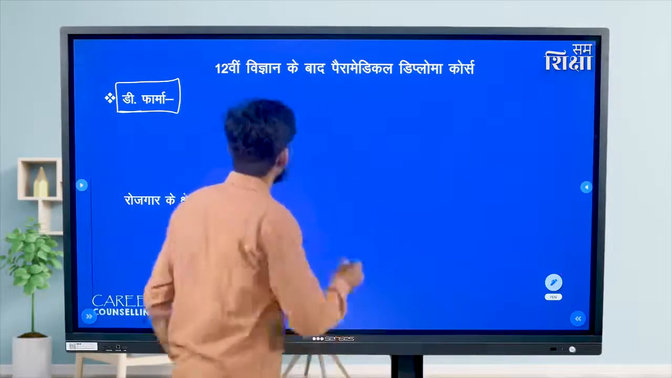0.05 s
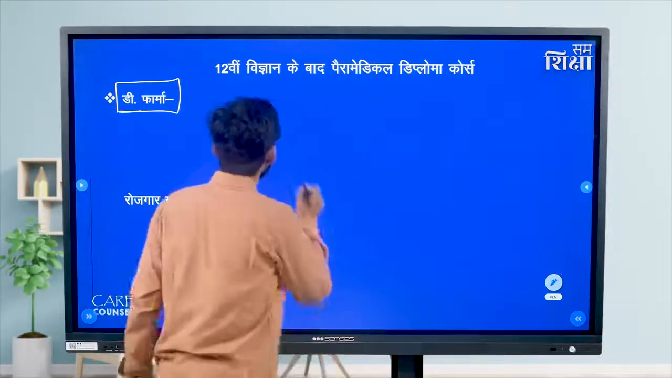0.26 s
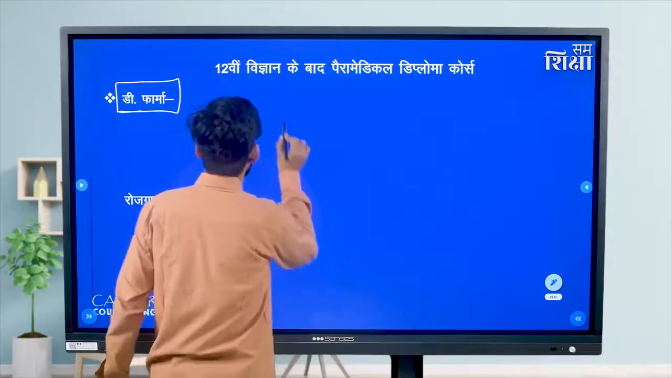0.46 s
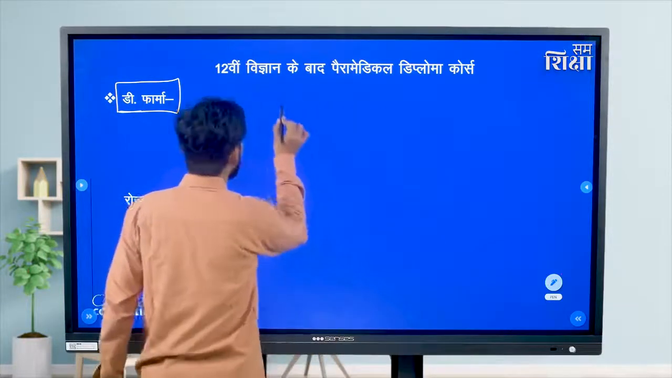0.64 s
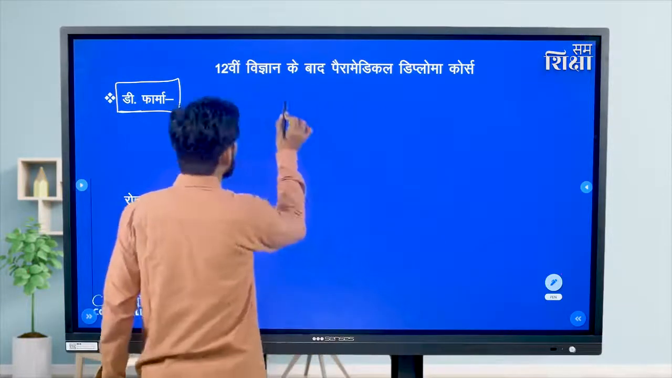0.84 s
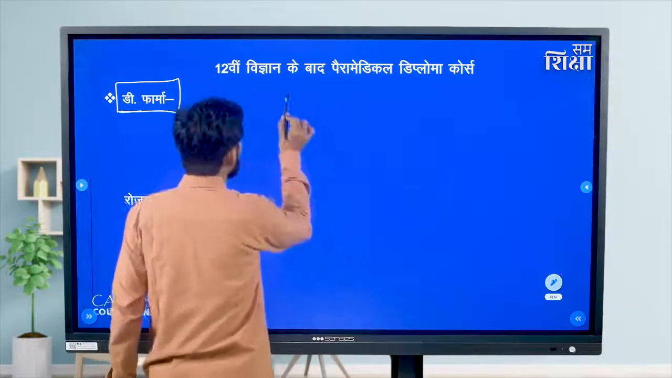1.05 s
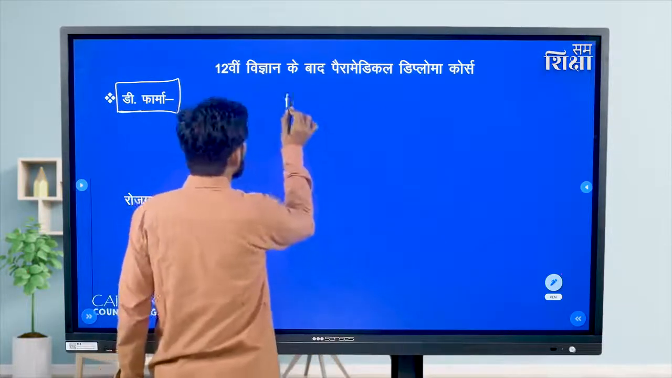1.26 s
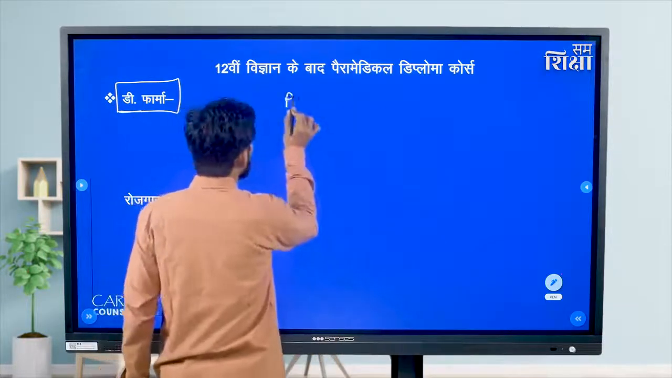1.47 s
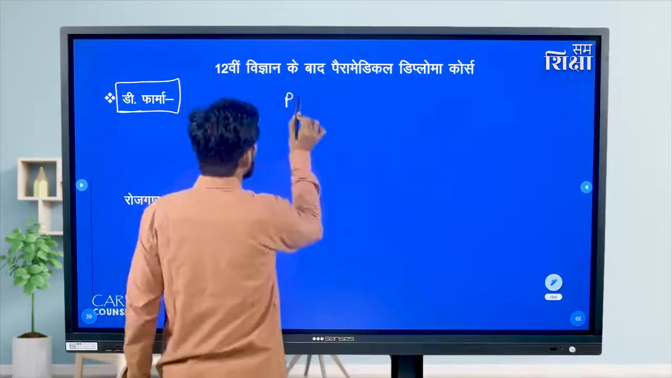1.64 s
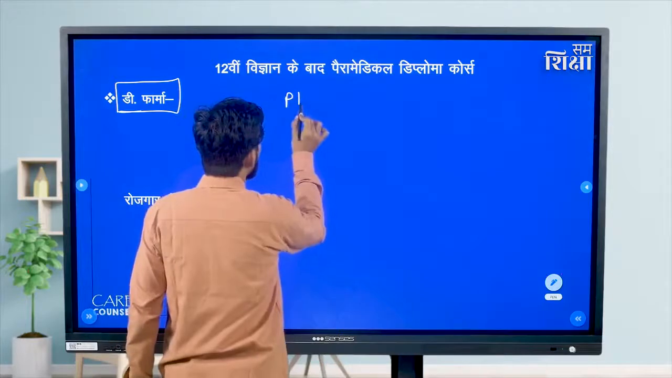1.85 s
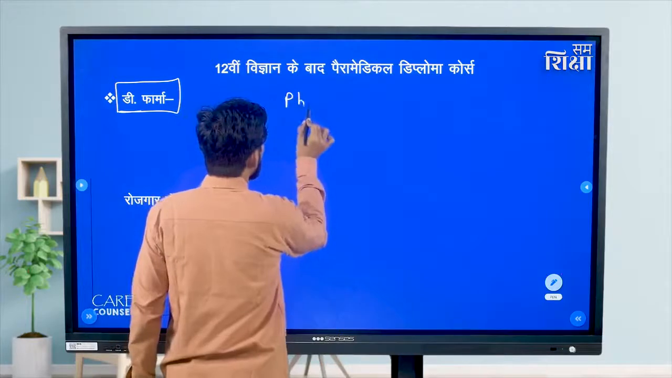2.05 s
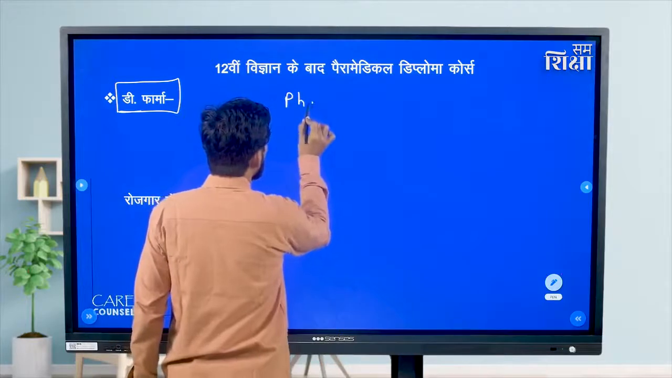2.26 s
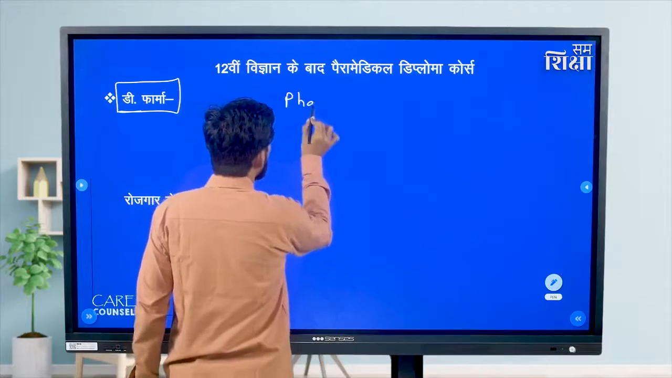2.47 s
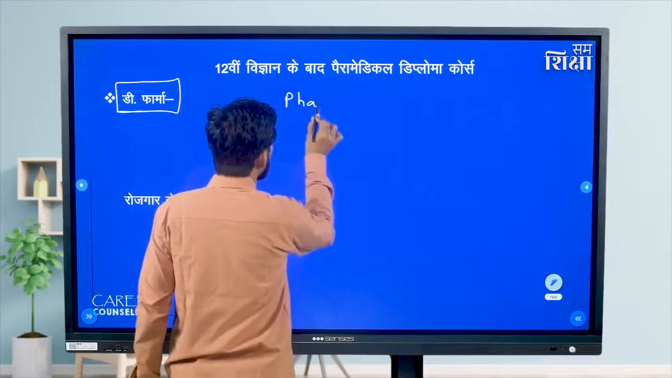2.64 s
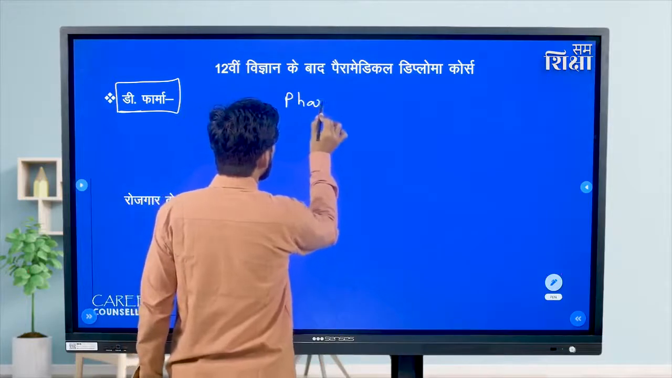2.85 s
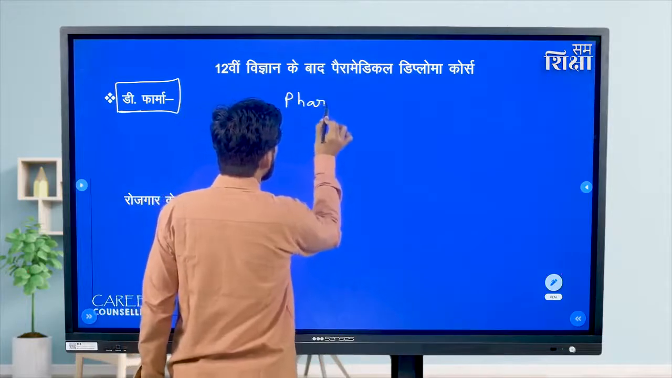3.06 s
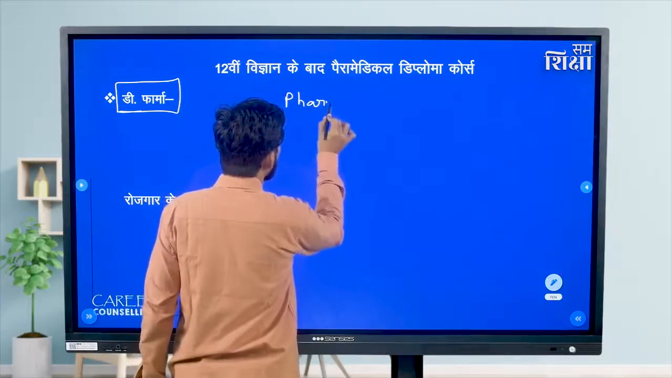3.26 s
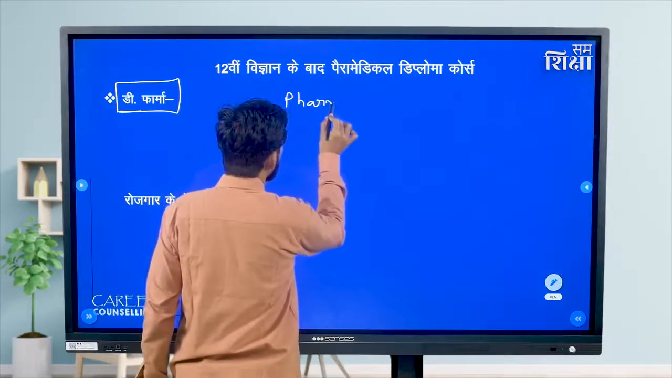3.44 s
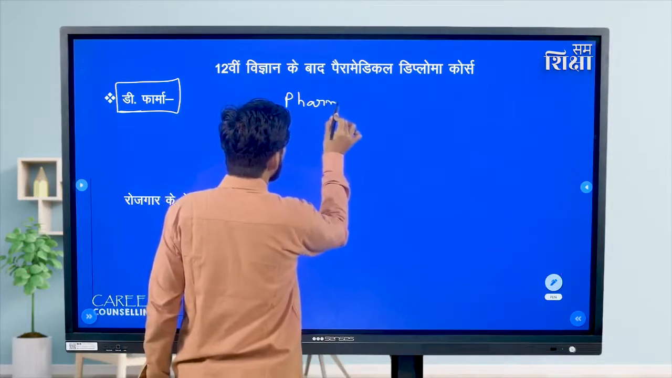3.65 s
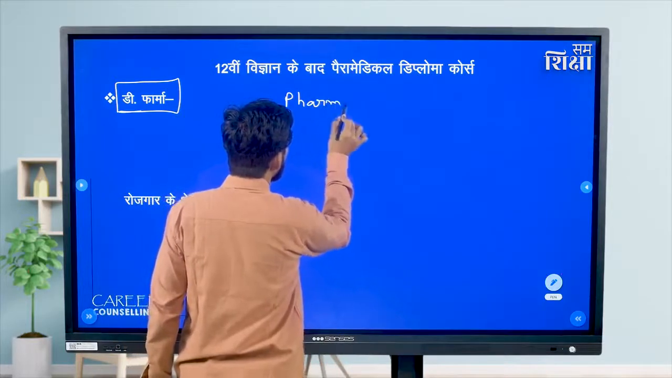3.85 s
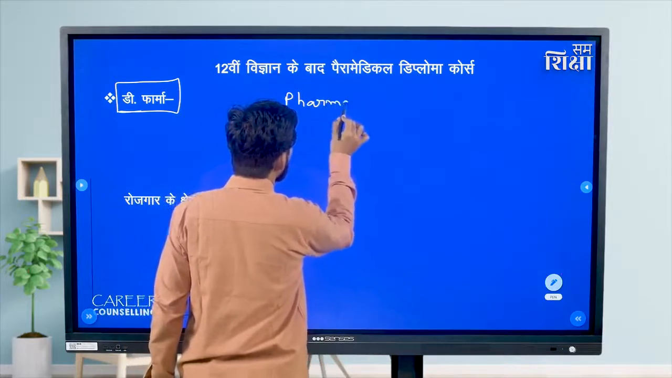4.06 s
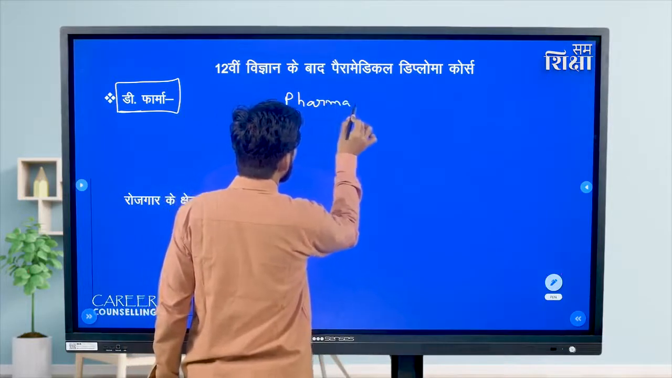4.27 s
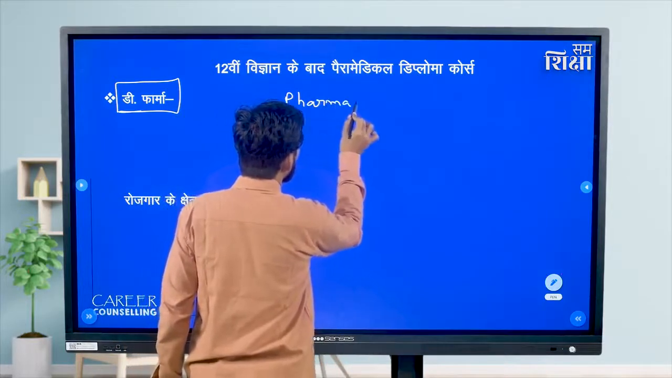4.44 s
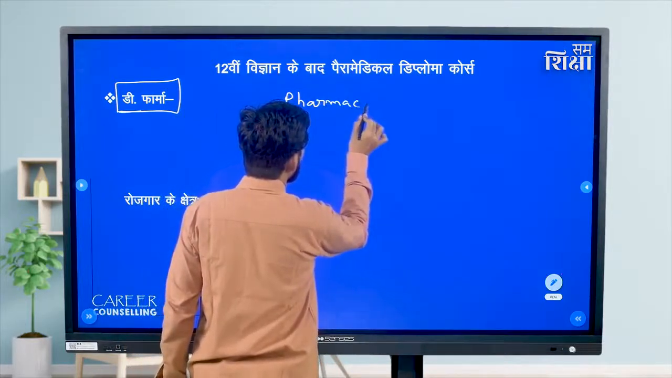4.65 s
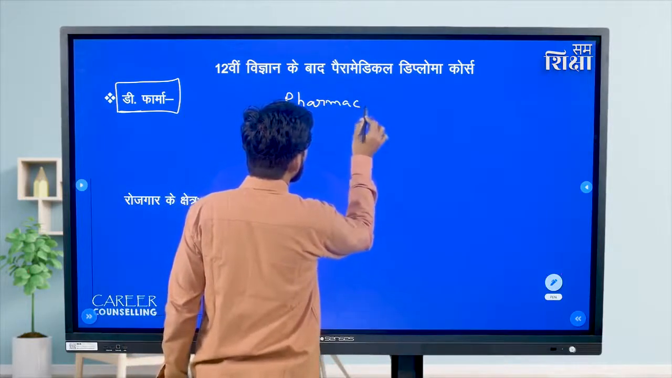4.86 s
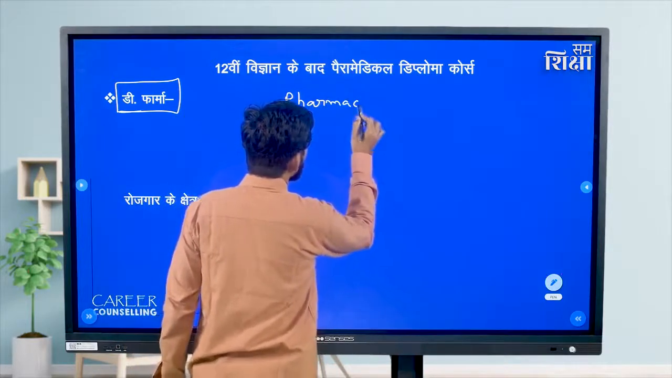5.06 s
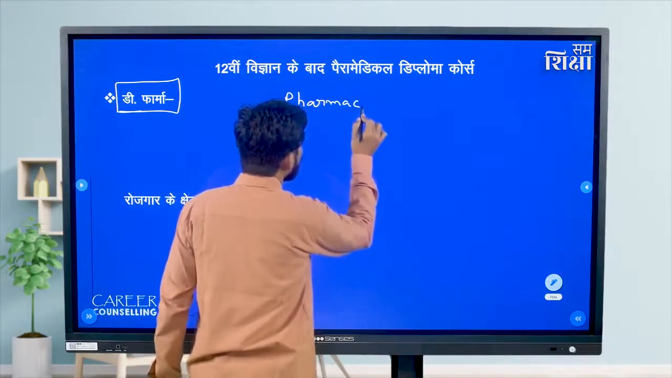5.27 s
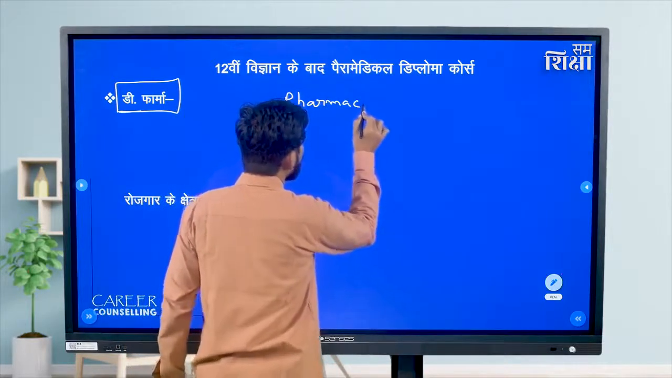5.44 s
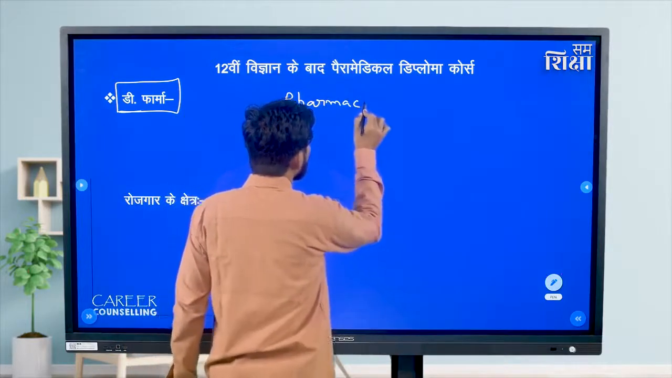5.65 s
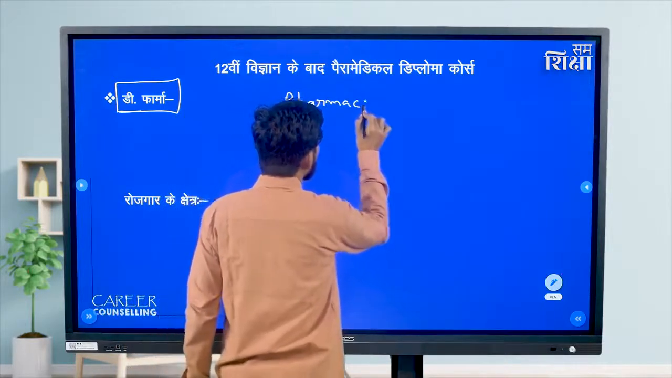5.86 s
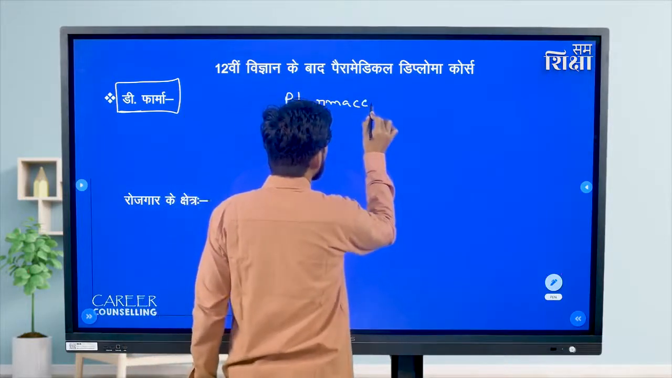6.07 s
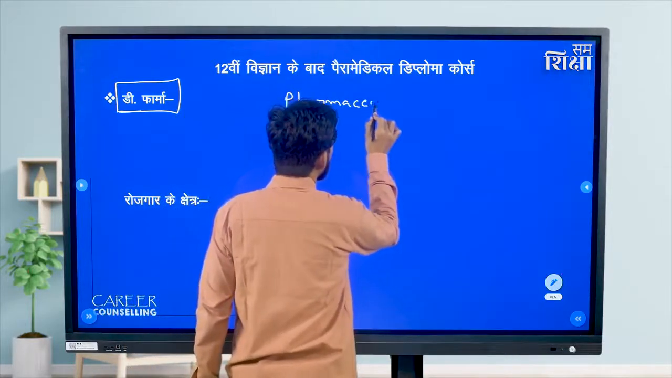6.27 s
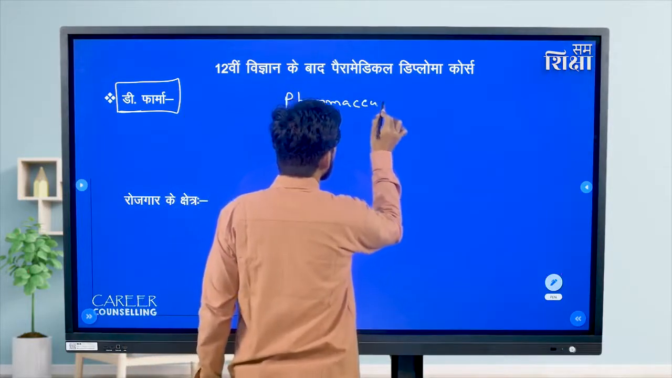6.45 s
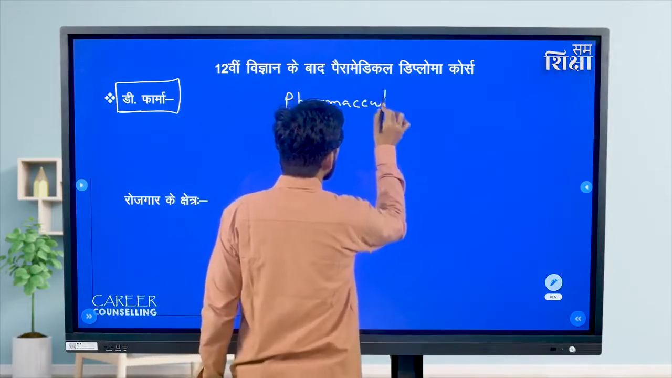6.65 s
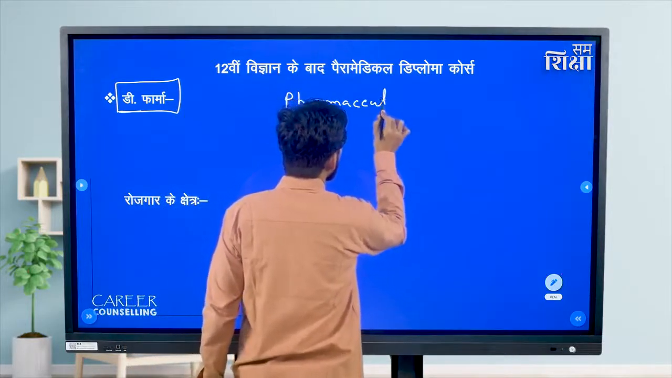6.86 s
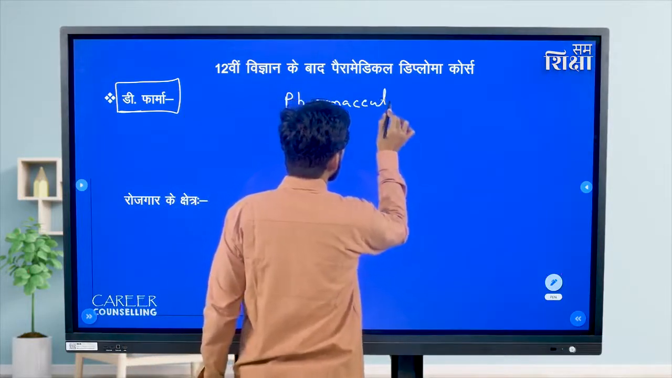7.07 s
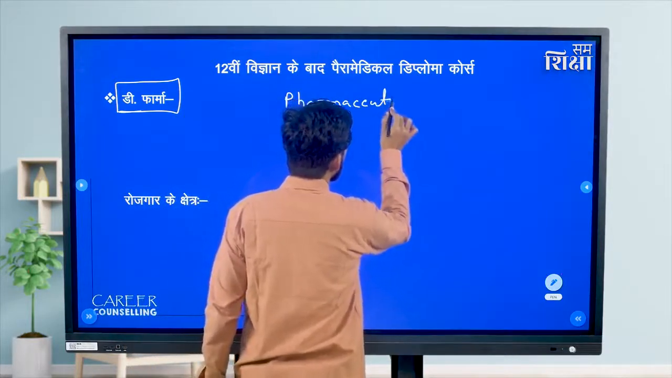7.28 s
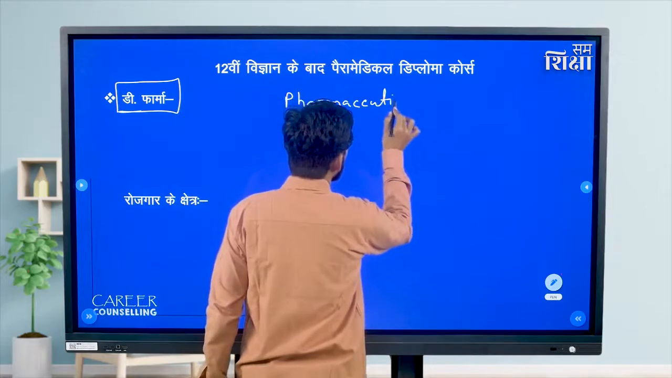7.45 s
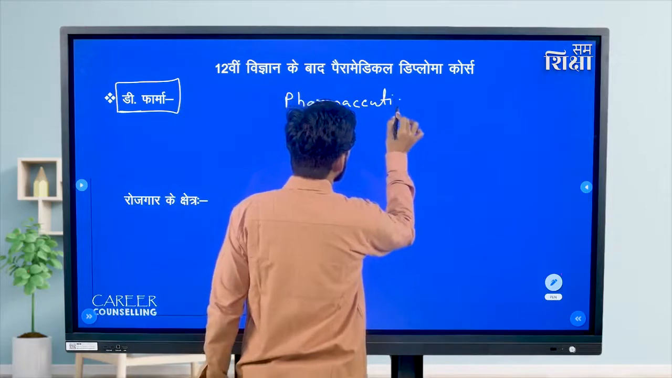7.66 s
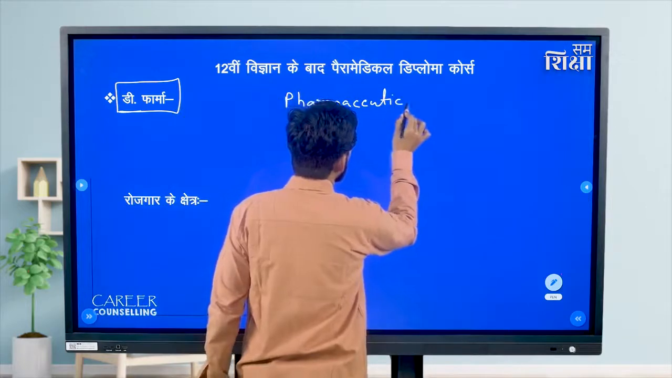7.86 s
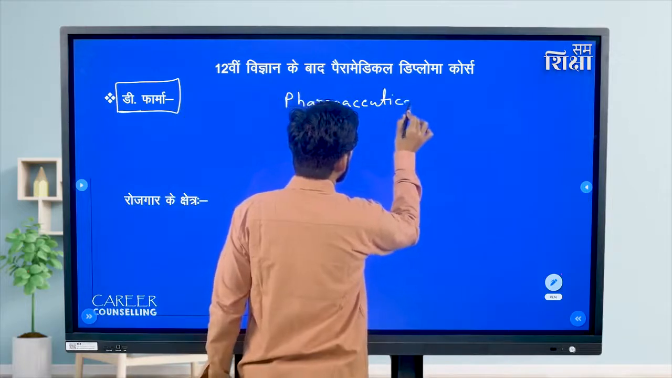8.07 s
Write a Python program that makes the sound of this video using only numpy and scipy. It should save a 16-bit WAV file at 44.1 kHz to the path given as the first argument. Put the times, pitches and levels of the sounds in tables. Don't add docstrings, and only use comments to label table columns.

```python
import sys
import numpy as np
from scipy import signal
from scipy.io import wavfile
from scipy.ndimage import uniform_filter1d

SR = 44100
rng = np.random.default_rng(int(sys.argv[2]) if len(sys.argv) > 2 else 0)


def store_wav(level_fs):
    pcm = np.round(np.clip(np.atleast_2d(level_fs), -1, 1) * 32767)
    wavfile.write(sys.argv[1], SR, pcm.T.astype(np.int16))


def volts_from_decibels(level):
    exponent = np.asarray(level, float) / 20
    return 10 ** exponent


N = 357651


def evened(x):
    return x / np.sqrt(np.mean(x ** 2) + 1e-20)


def read(f, value, hz):
    return np.interp(np.log(hz + 1), np.log(np.add(f, 1)), value)


def add(mix, s, sound):
    part = mix[max(round(s * SR), 0):][:len(sound)]
    part += sound[:len(part)]


def highpass(x, edge_hz):
    return signal.lfilter(*signal.butter(N=1, Wn=edge_hz, btype="high", fs=SR), x)


def ring(modes, rise_s):
    t = np.arange(24000) / SR
    sines = sum(volts_from_decibels(db - 60 * t / t60) * np.sin(2 * np.pi * hz * t) for hz, db, t60 in modes)
    return (1 - np.exp(-t / rise_s)) * sines


def noise(colour, patchy_db):
    real, imag, patches = rng.standard_normal((N // 256 + 5, 513, 3)).T
    patches = evened(uniform_filter1d(uniform_filter1d(patches, 12, 0), 10, 1))
    colour_db = read(*np.transpose(colour), np.fft.rfftfreq(1024, 1 / SR))[:, None]
    z = (real + 1j * imag) * volts_from_decibels(colour_db + patchy_db * patches)
    return evened(signal.istft(z, nperseg=1024, noverlap=768)[1][:N])


def level(rows, column, rise_share, release_s):
    t = np.arange(N) / SR
    gain = np.zeros(N)
    for row in rows:
        start_s, length_s = row[0], row[1]
        knees_s = [0, rise_share * length_s, length_s, length_s + release_s]
        gain += volts_from_decibels(row[column]) * np.interp(t - start_s, knees_s, [0, 1, 1, 0])
    return gain


def tap(s, blow_db, tip_db, panel_hz, long_hz):
    # (frequency [Hz], level [dB], t60 [s])
    tip_modes = [(2050, -7, 0.0031), (2596, -19, 0.016), (5050, -4.5, 0.0037), (6000, -26, 0.0046),
                 (7100, 11.5, 0.0038), (6830, -20.5, 0.0033), (8430, -11.5, 0.013), (9450, -0.5, 0.0054),
                 (11150, -6.5, 0.0047), (13600, -7.5, 0.0053), (13800, -10, 0.0048), (15000, -20.5, 0.0022)]
    # (time [s], bounce delay [ms], bounce share [1], room level [dB], long ring level [dB])
    stance = [
        (.88, 4.32, 0.73, .5, -19.5),
        (1.619, 3.52, 0.77, -0.5, -16),
        (2.18, 3.5, 0.79, -1, -17.5),
        (3.19, 3.62, .6, -1.5, -17),
        (4.412, 3.66, 1, 1.5, -20.5),
        (5.67, 2.8, 0.68, -0.5, -18.5),
        (7.4, 3, .5, -1, -16),
        (7.91, 2.63, 0.41, -1.5, -22),
    ]
    # (delay [ms], level [dB])
    walls = [(5.4, -9.5), (12, -22.5), (19.5, -20.5), (36, -20.5)]
    settle_s = 0.33
    t, long_t = np.arange(4000) / SR, np.arange(24000) / SR

    push = -np.sin(np.pi * np.clip((t - .00012) / 0.0011, 0, 1)) ** 2
    for edge_hz in (150, 500):
        push = highpass(push, edge_hz)
    push = uniform_filter1d(push, size=11)
    push /= abs(push).max()

    chatter_band = signal.butter(N=4, Wn=[4600, 15500], btype="band", fs=SR, output="sos")
    chatter = signal.sosfilt(chatter_band, rng.standard_normal(len(t)))
    tip = volts_from_decibels(tip_db) * (ring(tip_modes, 0.00038)[:len(t)] + volts_from_decibels(-24.5 - 60 * t / .025) * chatter)

    at, *columns = np.transpose(stance)
    delay_ms, share, room_db, long_db = (np.interp(s, at, column) for column in columns)
    modes = woken(s, long_hz, long_db)
    panel_db = -4.5 - 0.24 * (blow_db + 27)
    echoes = np.zeros(2000)
    echoes[round(delay_ms * SR / 1000)] = share
    for ms, db in walls:
        echoes[round(ms * rng.uniform(.97, 1.03) * SR / 1000)] += volts_from_decibels(db)

    feed = volts_from_decibels(1.5) * push + volts_from_decibels(-35.5) * tip
    feed += volts_from_decibels(tip_db + 1.5 - 60 * t / 0.0034) * chatter
    feed += volts_from_decibels(11.0) * board(modes, 0.00072, 0.051)[:len(t)]
    feed += volts_from_decibels(-34.5) * ring([(2775, 0.0027, 0.012)], .0003)[:len(t)]
    out = volts_from_decibels(room_db) * room(feed)

    add(out, 0, push + tip)
    add(out, 0, signal.fftconvolve(push + volts_from_decibels(-8.5) * tip, echoes))
    panel = ring([(panel_hz, 0, .07), (panel_hz * 1.19, -5, .06), (170, -8, .1)], 0.0088)
    add(out, .0035, volts_from_decibels(panel_db) * panel)
    add(out, .005, volts_from_decibels(-0.5 - (long_t / settle_s) ** 3) * board(modes, .045, 0.6))
    slap = ring([(panel_hz, 0, .09), (long_hz, -3, .12)], 0.0019)
    add(out, 0.082, volts_from_decibels(panel_db - 18.5) * slap)
    sway = -volts_from_decibels(-25.0) * np.sin(np.pi * np.clip(t / 0.04, 0, 1)) ** 2
    add(out, .006, highpass(sway, 9))
    out = signal.lfilter(*signal.iirnotch(3950, Q=4.0, fs=SR), out) + 0.12 * out
    return volts_from_decibels(blow_db) * out


def woken(s, long_hz, long_db):
    # (frequency [Hz], level [dB], a loud spot [cm], loud spot spacing [cm])
    standing = [(172.5, -35, 4, 65), (245.6, -33.5, 4.7, 21), (303, -25.5, 13.1, 24.3), (383, -25, 38, 77),
                (507.4, -22, 14.4, 33), (645, -22.5, 3.4, 17), (1144, -34, 14, 56), (1020, -35, 37, 58)]
    pen_cm_per_s = 5
    modes = [(long_hz, long_db)]
    for hz, db, spot_cm, gap_cm in standing:
        share = abs(np.cos(np.pi * (pen_cm_per_s * s - spot_cm) / gap_cm)) + 0.017
        modes.append((hz, db + 20 * np.log10(share)))
    return modes


def board(modes, rise_s, t60, beat_hz=8.7, neighbour_db=-6):
    close = []
    for hz, db in modes:
        for side in (-1, 0, 1):
            near_hz = hz + side * beat_hz * rng.uniform(.6, 1.4)
            close.append((near_hz, db + neighbour_db * abs(side), t60))
    return ring(close, rise_s)


def room(x, swell_db=1.5, swell_s=0.054, start_s=0.0023, bend_s=0.21):
    # (frequency [Hz], t60 [s], level [dB])
    bands = [(80, 0.42, -21), (139, 0.58, 2.5), (424, 0.75, -6), (790, 0.57, -6), (1285, 0.39, -1.5),
             (1660, 0.31, -8.5), (2550, 0.18, 13.5), (3305, .22, 5.5), (4550, 0.24, 5), (5600, 0.16, -9),
             (7000, 0.37, -12), (11650, 0.18, -11), (15620, 0.17, -9.5), (15850, 0.28, -64.5)]
    count, gap = 30000, 20
    taps = np.zeros(count)
    places = np.arange(0, count, gap) + rng.integers(0, gap, count // gap)
    taps[places] = rng.choice([-1., 1.], count // gap)
    hz, t, z = signal.stft(taps, SR, nperseg=256)
    f, t60, db = np.transpose(bands)
    decay_db = read(f, db, hz)[:, None] - 60 * t / read(f, t60, hz)[:, None]
    tail = signal.istft(z * volts_from_decibels(decay_db), SR, nperseg=256)[1][:count]
    t = np.arange(count) / SR
    swell = swell_db * np.clip((t - swell_s) / 0.0044, 0, 1)
    tail *= volts_from_decibels(swell - (t / bend_s) ** 3 - 16.0) * np.clip(t / start_s - 1, 0, 1)
    return signal.fftconvolve(x, tail)


def sliding():
    # (start [s], length [s], hiss level [dB])
    strokes = [(1.06, .14, -89), (1.17, 0.25, -93), (1.82, 0.19, -92), (2.34, 0.089, -93), (2.5, .08, -96),
               (2.6, 0.15, -91.5), (2.83, 0.1, -94), (2.98, 0.051, -95), (3.44, 0.08, -95),
               (3.62, .15, -99), (4.1, .08, -100), (4.55, 0.048, -95), (5.07, 0.11, -101),
               (5.85, 0.11, -91.5), (6.4, 0.21, -90.5), (6.67, 0.15, -88.5), (7.12, 0.083, -94),
               (7.67, 0.064, -85.5)]
    # (frequency [Hz], level [dB])
    slide_colour = [(4000, -17), (6000, -33), (8500, -3.5), (9400, -3.5), (10300, -10.5), (13000, -5),
                    (15600, -10), (15900, -31)]
    # (start [s], length [s], start pitch [Hz], end pitch [Hz], level [dB])
    squeaks = [(4.724, .05, 11150, 12300, -101), (4.78, 0.038, 9650, 10000, -103),
               (4.82, 0.044, 11200, 11900, -100), (4.853, .12, 11700, 11500, -99),
               (4.838, .13, 13400, 12400, -100), (4.84, 0.034, 14500, 14350, -101),
               (4.836, .12, 9600, 9000, -104), (4.99, .065, 13400, 13450, -99),
               (5.045, 0.045, 12150, 11500, -99), (5.06, .03, 9800, 9450, -100),
               (5.09, 0.02, 8950, 8800, -100)]
    whisper_hz, whisper_hz_per_db, whisper_width_hz = 7450, 32, 700

    press = level(strokes, column=2, rise_share=.6, release_s=0.012)
    press_db = 20 * np.log10(press + volts_from_decibels(-102))
    centre_hz = whisper_hz + whisper_hz_per_db * (press_db + 88)
    turn = np.exp(2j * np.pi * np.cumsum(centre_hz) / SR)
    r = np.exp(-np.pi * whisper_width_hz / SR)
    two_poles = np.convolve([1, -r], [1, -r])
    whisper = (turn * signal.lfilter([1], two_poles, rng.standard_normal(N) / turn)).real
    out = press * (evened(whisper) + volts_from_decibels(1.0) * noise(slide_colour, 3.9))

    for s, length_s, start_hz, end_hz, db in squeaks:
        count = round(length_s * SR)
        wobble = evened(uniform_filter1d(rng.standard_normal(6000), 300))[:count]
        hz = np.linspace(start_hz, end_hz, count) + 25 * wobble
        squeak = np.sin(2 * np.pi * np.cumsum(hz) / SR) * signal.windows.tukey(count, .6)
        add(out, s, volts_from_decibels(db + 8.5) * squeak)
    return out


def sleeve():
    # (start [s], length [s], high rustle level [dB], low rustle level [dB])
    rubs = [
        (-.1, 0.21, -77.5, -75),
        (.1, 0.54, -95, -80.5),
        (.38, .05, -102, -85),
    ]
    fizz = noise([(7500, -40), (9200, -11), (9700, -4), (12200, -5.0), (12800, -12), (15700, -19),
                  (15900, -32)], 1.7)
    brush = noise([(200, 1), (500, 1.0), (1150, -10.5), (1250, 4.5), (1350, -7.5), (3000, -10.0),
                   (6000, -19), (9000, -19.5)], 0.79)
    high, low = (level(rubs, column, rise_share=0.24, release_s=0.088) for column in (2, 3))
    return high * fizz + low * brush


def knocks():
    # (time [s], level [dB], frequency [Hz], t60 [s])
    steps = [
        (.565, -68.5, 615, 0.05),
        (.6, -71, 636, 0.15),
        (.635, -64.5, 704, 0.071),
        (4.9, -69.5, 660, 0.075),
        (5.333, -57, 600, 0.062),
        (5.357, -63.5, 662, 0.13),
        (5.39, -57.5, 640, 0.043),
    ]
    # (time [s], level [dB])
    clicks = [
        (5.2607, -61),
        (5.11, -74),
    ]
    # (frequency [Hz], level [dB], t60 [s])
    joint = [(1480, 0, .014), (1880, -4, .012), (2400, -11, .004), (2850, -11, .005), (3400, -14, .004),
             (4200, -15, .004)]
    out = np.zeros(N)
    for s, db, hz, t60 in steps:
        modes = [(hz, db + 15, t60 * 0.23), (hz, db + 1.5, t60 * 0.64), (hz * 1.7, db, t60 * 0.22)]
        thump = ring(modes, 0.0041)
        add(out, s, thump)
        add(out, s, volts_from_decibels(0.5) * room(thump))
    for s, db in clicks:
        click = volts_from_decibels(db) * ring(joint, 0.0001)
        add(out, s, click)
        add(out, s, volts_from_decibels(9.0) * room(click, swell_db=5))
    return out


def hum():
    # (multiple of mains [1], level [dB])
    multiples = [(1, -63.5), (2, -70), (3, -90.5), (4, -83), (5, -89.5), (6, -88.5), (7, -100), (8, -96.5),
                 (11, -94)]
    mains_hz, start_rad, lag_rad = 50.077, -3.22, .8
    turn = 2 * np.pi * mains_hz * np.arange(N) / SR + start_rad
    return sum(np.sqrt(2) * volts_from_decibels(db) * np.cos(k * turn - lag_rad * (k - 1)) for k, db in multiples)


def hiss():
    # (frequency [Hz], level [dB per Hz])
    hiss_colour = [(20, -26.5), (60, -13), (110, -23.5), (200, -25.5), (400, -28), (1000, -31),
                   (1500, -34.5), (1680, -33), (1900, -37.5), (4180, -45), (7730, -46), (12750, -46.5),
                   (15700, -42.5), (15900, -82)]
    return volts_from_decibels(-77.5) * noise(hiss_colour, patchy_db=.7)


def scene():
    # (time [s], blow level [dB], tip ring over the blow [dB], quick panel ring [Hz], long board ring [Hz])
    landings = [(0.8777, -27.5, -5.5, 674, 452), (1.6166, -25, -7, 593, 560),
                (2.1817, -31.5, -6.5, 548, 543), (3.1915, -22.5, -6.5, 561, 543),
                (3.9568, -29.5, -7, 541, 586), (4.4139, -31, -7, 536, 543), (5.674, -22.5, -10.5, 649, 624),
                (6.135, -30.5, -7.5, 662, 624), (6.9633, -24.5, -6, 591, 597),
                (7.3903, -25.5, -6.5, 580, 597), (7.624, -27, -10, 631, 597),
                (7.9074, -30, -10.5, 668, 651)]
    mix = hum() + hiss() + sliding() + sleeve() + knocks()
    for row in landings:
        add(mix, row[0], tap(*row))
    return mix[None]


def band_limit(x):
    return signal.sosfilt(signal.butter(12, 16790, fs=SR, output="sos"), x)


def record(dry):
    top_hz, bands, band_bins, keep_db, edge_hz = 12830, 5, 32, 3.5, 16500
    hz, _, z = signal.stft(dry[0], SR, nperseg=2048)
    first = np.searchsorted(hz, top_hz)
    last = first + bands * band_bins
    top = z[first:last].reshape(bands, band_bins, -1)
    power = (abs(top) ** 2).mean(1, keepdims=True)
    quiet = power < volts_from_decibels(2 * keep_db) * np.median(power)
    z[first:last] = (top * np.where(quiet, volts_from_decibels(-20.5), 1)).reshape(bands * band_bins, -1)
    z[hz > edge_hz] = 0
    mix = signal.istft(z, SR, nperseg=2048)[1][None, :N]
    return band_limit(mix)


dry = scene()
out = record(dry)
store_wav(out)
```